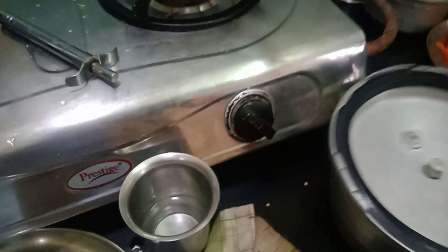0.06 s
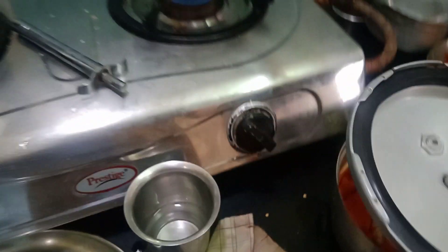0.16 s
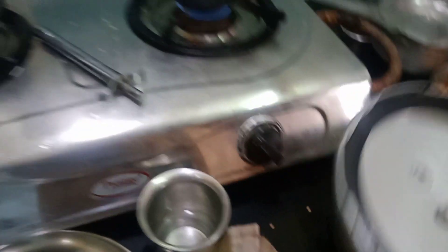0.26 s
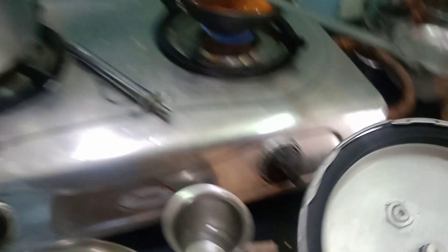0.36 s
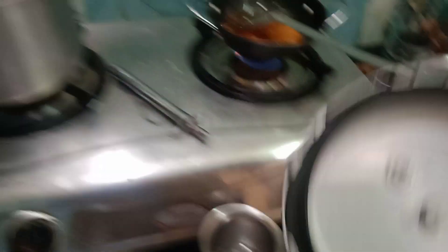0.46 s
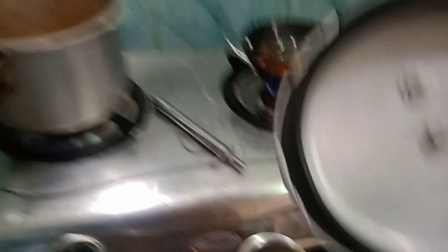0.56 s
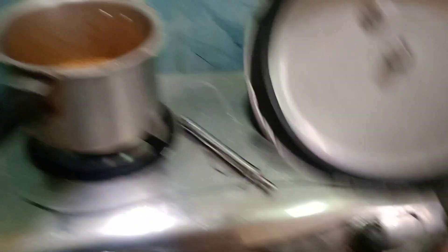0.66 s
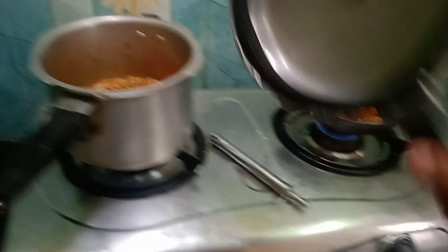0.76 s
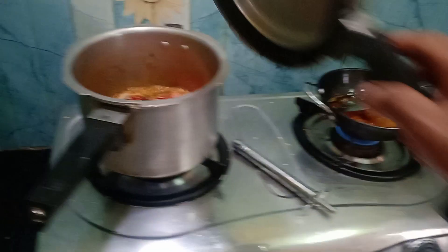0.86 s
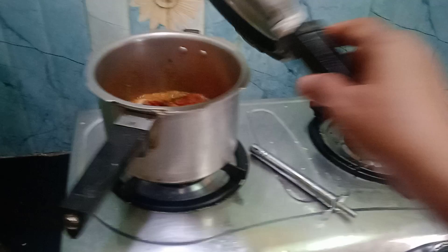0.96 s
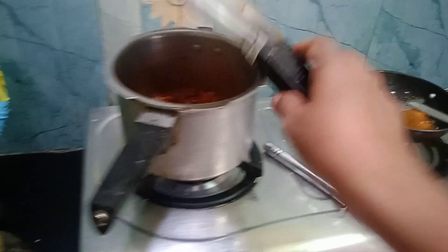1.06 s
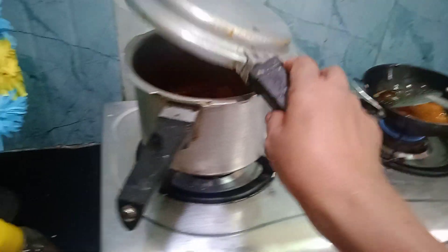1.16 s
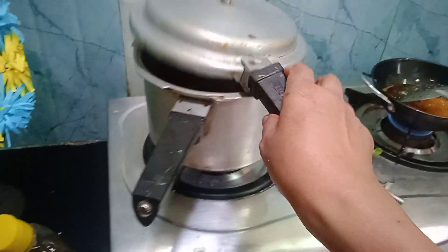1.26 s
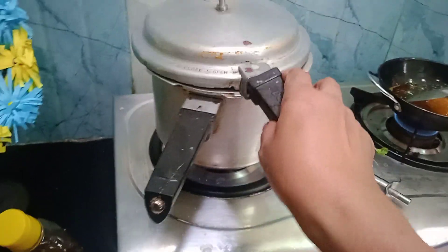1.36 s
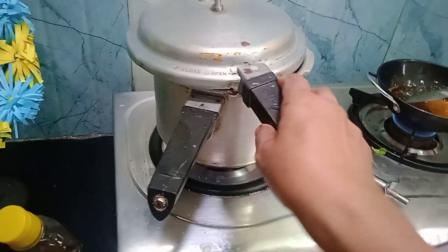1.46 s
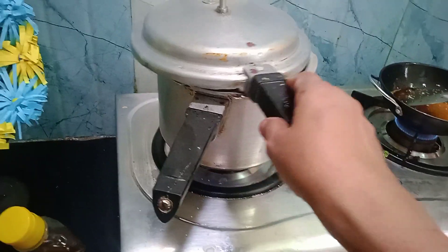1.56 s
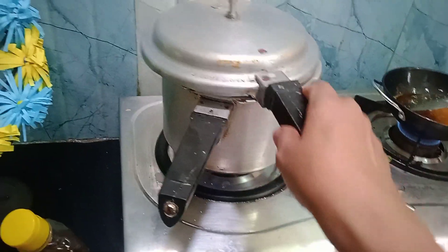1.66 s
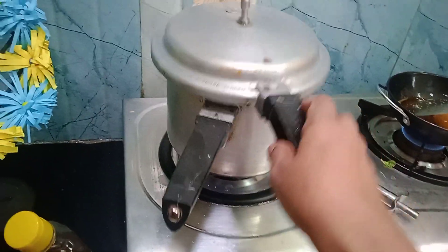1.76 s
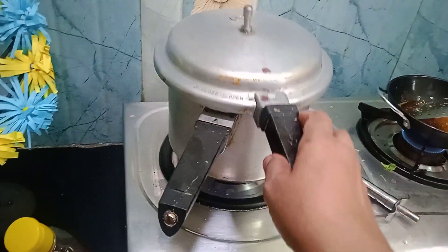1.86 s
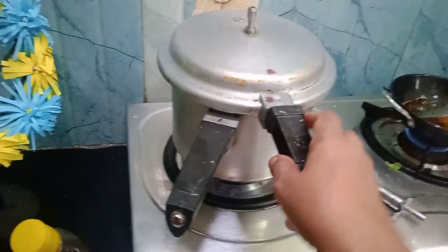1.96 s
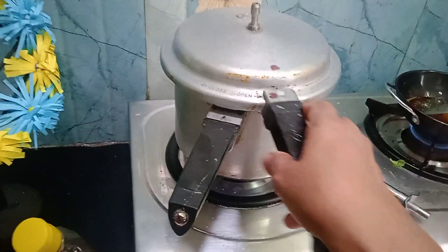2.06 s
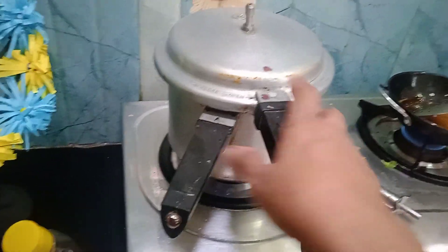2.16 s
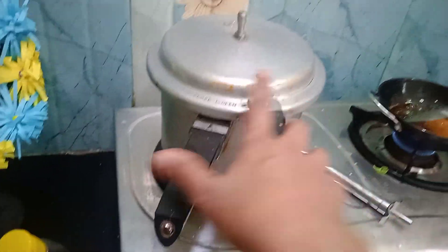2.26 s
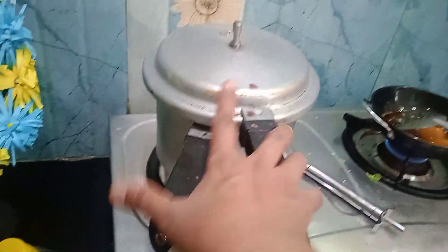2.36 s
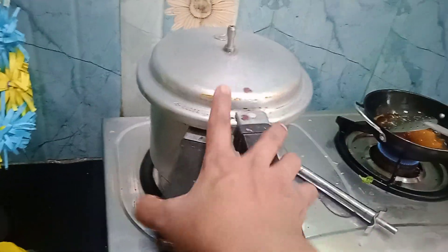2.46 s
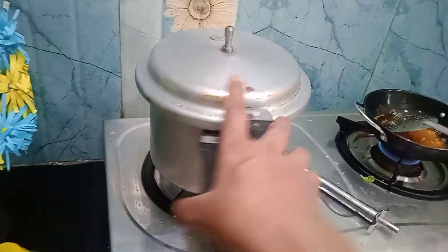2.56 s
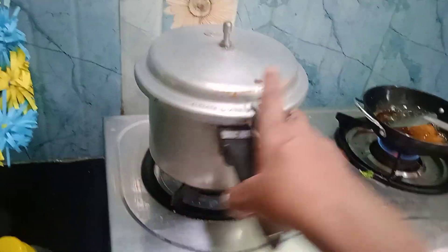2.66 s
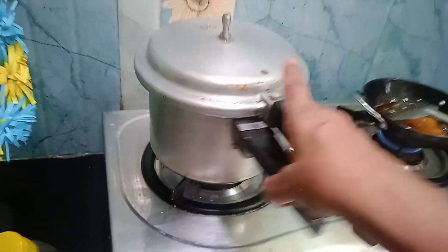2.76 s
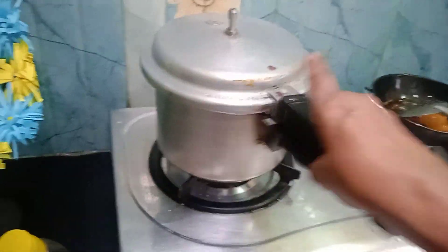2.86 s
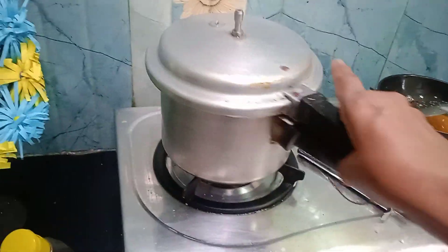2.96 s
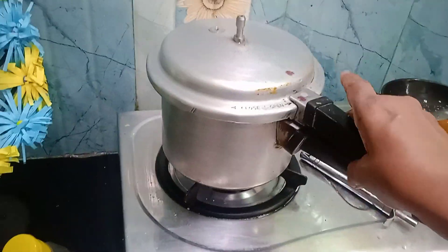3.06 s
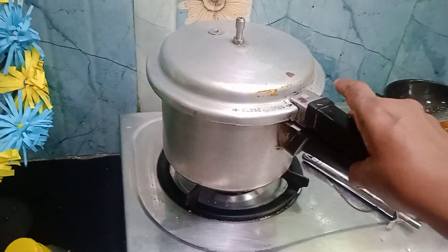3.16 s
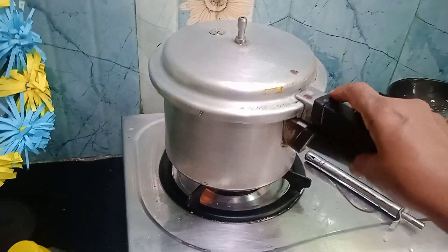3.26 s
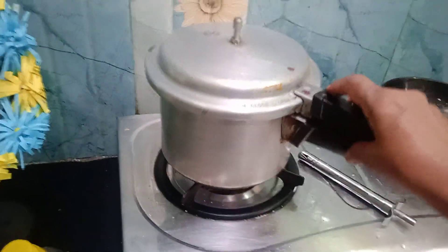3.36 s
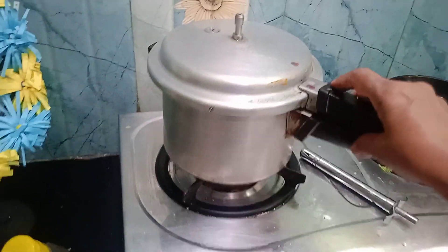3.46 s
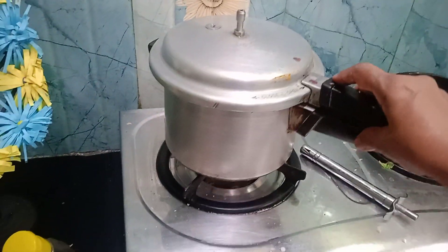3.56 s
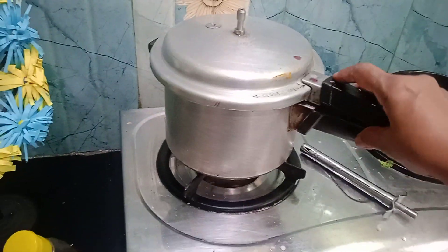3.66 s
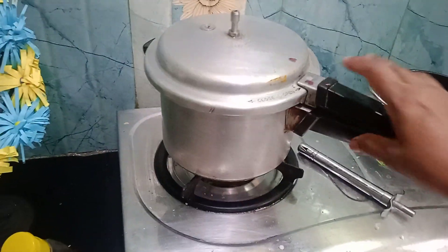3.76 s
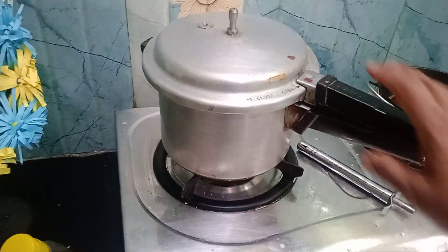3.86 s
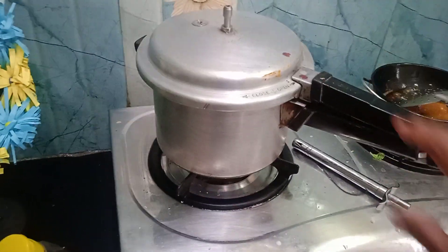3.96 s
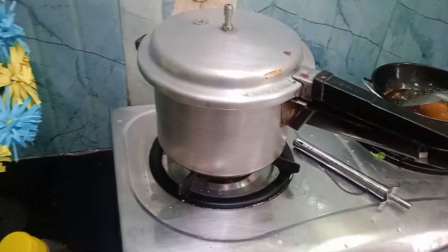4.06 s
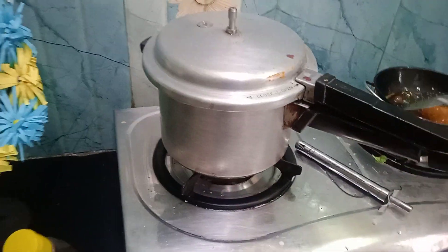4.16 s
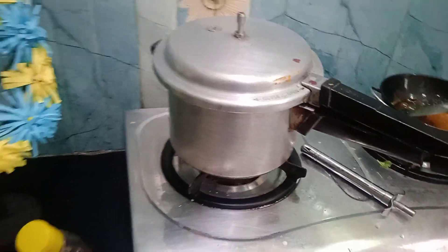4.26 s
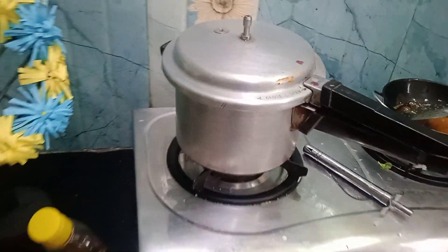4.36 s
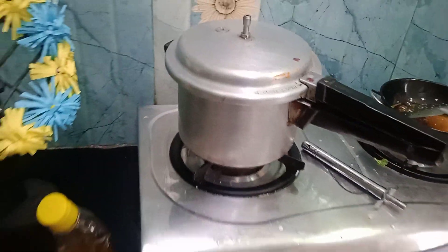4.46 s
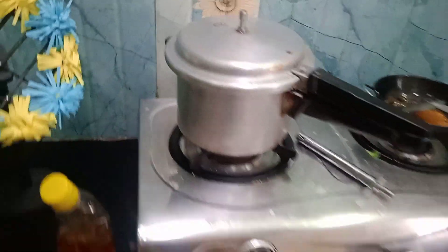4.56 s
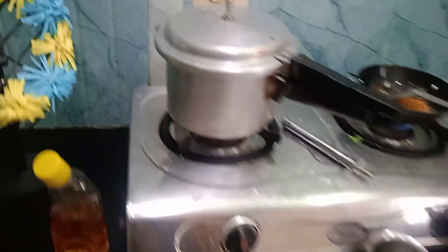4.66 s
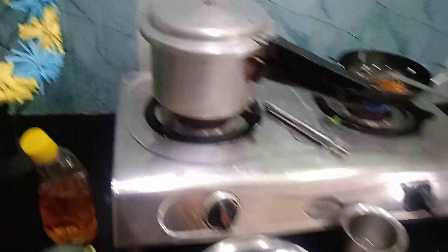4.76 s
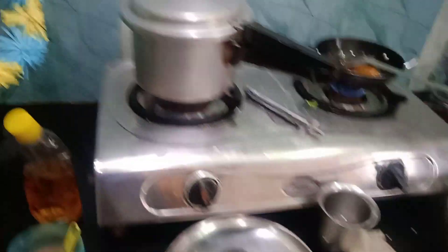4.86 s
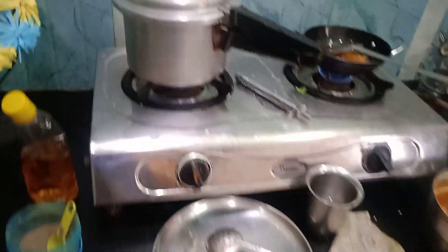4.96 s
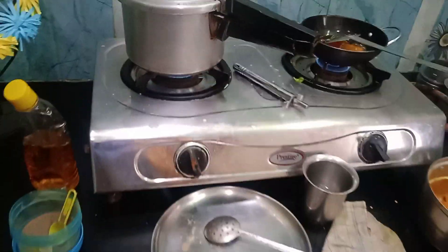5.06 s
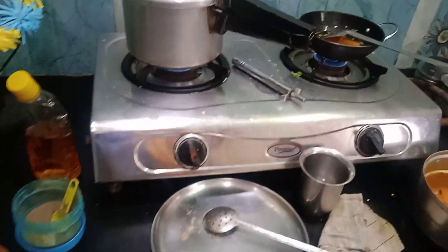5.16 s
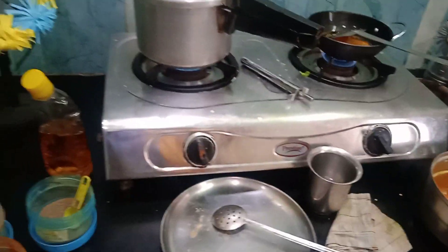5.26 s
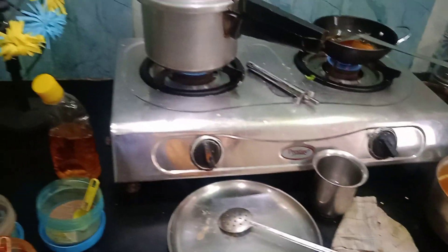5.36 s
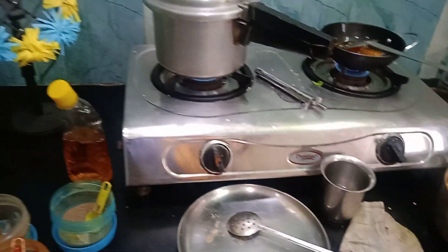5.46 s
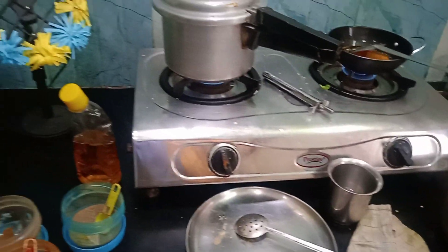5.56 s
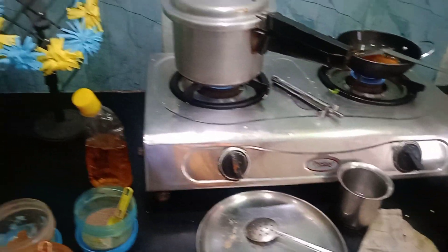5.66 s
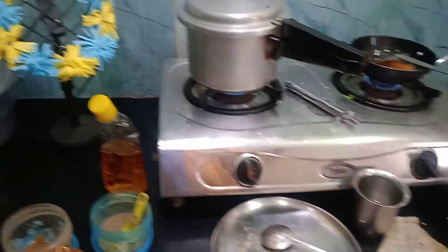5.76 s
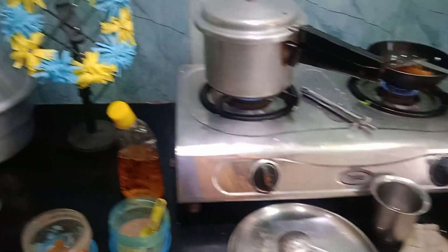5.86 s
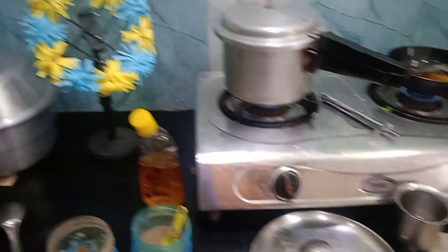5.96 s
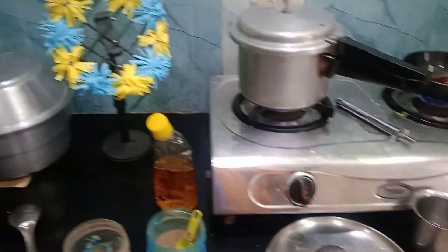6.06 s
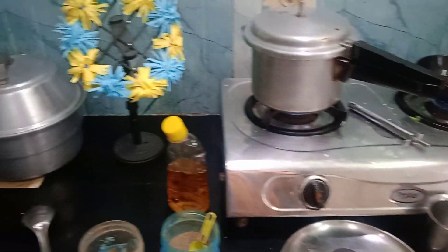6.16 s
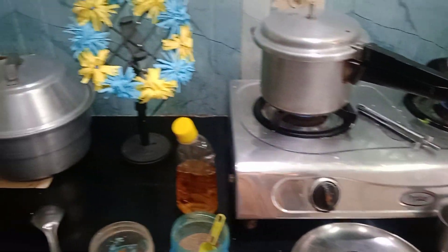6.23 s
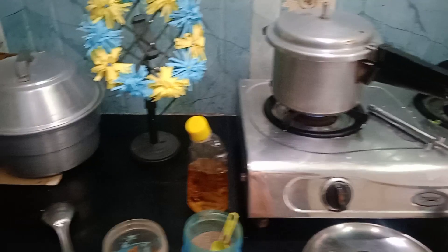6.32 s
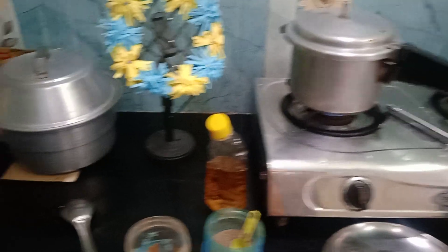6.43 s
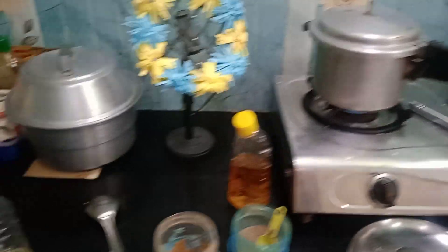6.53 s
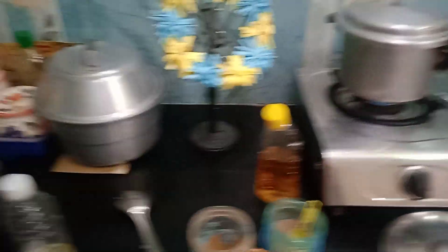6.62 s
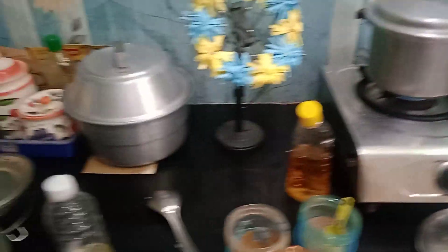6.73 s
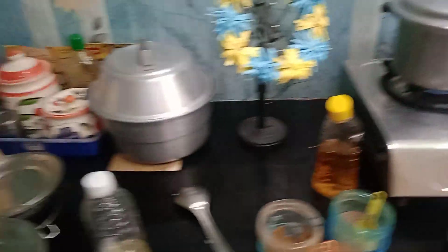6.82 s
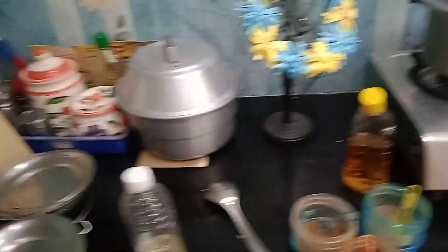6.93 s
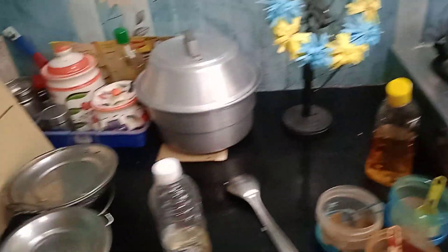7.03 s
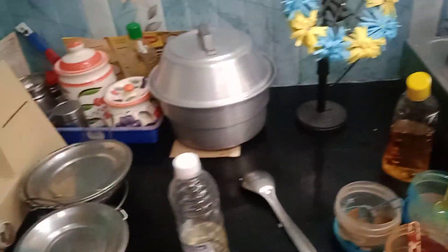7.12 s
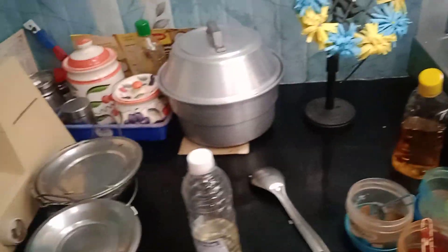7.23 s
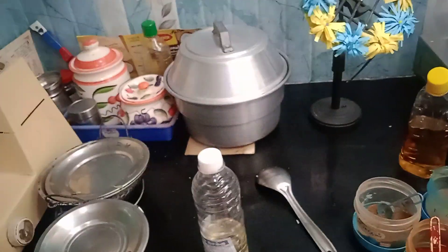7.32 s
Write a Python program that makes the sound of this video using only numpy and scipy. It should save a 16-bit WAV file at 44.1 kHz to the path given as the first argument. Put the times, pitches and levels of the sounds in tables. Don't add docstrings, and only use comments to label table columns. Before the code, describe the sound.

In a small tiled kitchen, oil sizzles softly throughout. An aluminium lid leaves a stone counter with dull taps, knocks a pot rim with a clear ring, then drops on with a bright clang. It rattles and scrapes, thuds into its seat, and locks with crisp clicks. After the handle is let go, only sizzling, faint hum and distant clinks remain, picked up by a close phone microphone.

```python
import sys
import numpy as np
from scipy import signal
from scipy.fft import rfft, irfft, next_fast_len
from scipy.io import wavfile
from scipy.ndimage import uniform_filter1d

SR = 44100
rng = np.random.default_rng(int(sys.argv[2]) if len(sys.argv) > 2 else 0)


def digitize_waveform(pressure):
    field = np.atleast_2d(pressure).T
    bounded = np.clip(field, -1, 1)
    quanta = np.round(bounded * 32767).astype(np.int16)
    wavfile.write(sys.argv[1], SR, quanta)


def boost(x):
    u = np.asarray(x, float) / 20
    return 10 ** u


N = 325899

# hz, level_db, t60_s
LID_RING = [(212, -12, .25), (270, -14, .3), (339, 0, .45), (414, -8, .4), (458, -7, .4), (563, -12, .3),
            (690, -11, .3), (764, -11, .4), (851, -13, .4), (1010, -13, .3), (1063, -14, .4),
            (1350, -14, .4), (1505, -13, .3), (1788, -11, .3), (2003, -9, .25), (2445, 3.5, .3),
            (2612, 7, .42), (2560, 0.1, .25), (2686, 2.5, .36), (3050, -10, .3), (3811, -20, .3),
            (4520, -16, .3), (4985, -4, .3), (5400, -8, .3), (6100, -8, .35), (6180, -3, .35),
            (6670, -16, .2), (7159, -6, .3)]
# hz, level_db, t60_s
CLOSED_POT_RING = [(82, -9, .25), (101, -6, .3), (195, -4, .3), (325, 0, .3), (440, -6, .3), (535, -4, .3),
                   (650, -2.5, .25), (764, 0.1, .25), (996, -9, .25), (1480, -18, .12), (1850, -14, .06),
                   (2630, -18, .12), (4900, -24, .08), (6600, -22, .06)]
# hz, density_db (per Hz)
LOOSE_METAL_HAZE = [(60, -51.5), (150, -13), (210, -9), (330, -3), (540, -8.5), (1000, -13.5), (1950, -10),
                    (2300, -15.5), (3040, -17), (6000, -9.5), (8000, -15), (12500, -40.5), (14000, -40),
                    (15200, -27.5)]
# hz, density_db (per Hz)
DAMPED_HAZE = [(50, -26.5), (85, -10), (141, -45.5), (200, -3.5), (330, 0), (540, -7.5), (760, -13.5),
               (1180, -14), (3250, -22), (6550, -11.5), (8500, -25), (12000, -39), (13800, -44.5),
               (15200, -27)]


def on_log(table, hz):
    table_hz, value = np.transpose(table)
    return np.interp(np.log(np.maximum(hz, 1)), np.log(table_hz), value)


def colour(x, table):
    n = next_fast_len(len(x))
    gain = boost(on_log(table, np.fft.rfftfreq(n, 1 / SR)))
    return irfft(rfft(x, n) * gain, n)[:len(x)]


def unit(x):
    return x / np.sqrt(np.mean(x ** 2))


def band(x, hz, width_hz):
    return signal.lfilter(*signal.iirpeak(hz, hz / width_hz, SR), x)


def walk(rate_hz):
    held = int(SR / rate_hz)
    steps = np.repeat(rng.standard_normal(N // held + 1), held)
    return uniform_filter1d(steps, held)[:N]


def fading(t, t60_table, stretch):
    spectrum = rfft(rng.standard_normal(len(t)))
    hz = np.fft.rfftfreq(len(t), 1 / SR)
    out = 0
    for low in 44 * 2. ** np.arange(10):
        octave = irfft(spectrum * ((hz >= low) & (hz < 2 * low)), len(t))
        t60_s = stretch * on_log(t60_table, low * np.sqrt(2))
        out = out + octave * boost(-60 * t / t60_s)
    return out


def hollow(t, hz, width_hz):
    lowpass = signal.butter(2, width_hz / 2, fs=SR, output="sos")
    sway = unit(signal.sosfilt(lowpass, rng.standard_normal((2, 65536))))[:, -len(t):]
    return sway[0] * np.cos(2 * np.pi * hz * t) + sway[1] * np.sin(2 * np.pi * hz * t)


def blows(events, modes, metal, ring_above_db, dense_db, dense_t60, chatter_s, crack_db, rise_s, lowest_hz):
    out = np.zeros(N + 16384)
    t = np.arange(16384) / SR
    for start_s, peak_db, bass_db, treble_db, ring in events:
        ring = max(ring, .1)
        ring_db = treble_db + ring_above_db
        balance = [(lowest_hz / 2, bass_db - 30.0), (lowest_hz, bass_db), (300, bass_db), (700, 0),
                   (1500, 0), (2400, ring_db), (3000, ring_db), (4500, treble_db)]
        chatter = rng.standard_normal(len(t)) * np.exp(-t / chatter_s)
        tones = 0
        for (hz, db, t60_s), detune in zip(modes, rng.standard_normal(len(modes))):
            turn = 2j * np.pi * hz * (1 + 0.0017 * detune) / SR
            pole = np.exp(turn - np.log(1000) / (ring * t60_s * SR))
            tone = signal.lfilter([1], [1, -pole], chatter)
            tones = tones + boost(db) * tone.imag / np.abs(tone).max()
        haze = fading(t, [(150, 1.42 * dense_t60), (8000, dense_t60)], ring)
        crack = rng.standard_normal(len(t)) * np.exp(-t / .0015)
        dense = colour(haze + boost(crack_db) * crack, metal)
        hit = tones / 2 + boost(dense_db) * dense * boost(16.5)
        contact = 1 - np.exp(-t / rise_s)
        fade_out = np.minimum(1, (t[-1] - t) * 20)
        hit = colour(hit * contact, balance) * fade_out
        k = int(start_s * SR)
        out[k:k + len(t)] += boost(peak_db) * hit
    return out[:N]


def knocks(events, width_hz, cycles, rough, tail_t60):
    out = np.zeros(N + 16384)
    t = np.arange(16384) / SR
    for start_s, peak_db, hz, tail_db in events:
        noise = rng.standard_normal((2, len(t)))
        snap_s = cycles / hz
        push = np.sin(2 * np.pi * hz * t) + rough * noise[0]
        push = push * np.exp(-(t / snap_s - 1) ** 2 * 2)
        snap = band(band(push, hz, width_hz), hz, width_hz)
        tail = unit(band(band(noise[1], hz, width_hz), hz, 0.76 * width_hz))
        tail = tail * boost(tail_db - 60 * t / tail_t60) * np.minimum(1, t / snap_s)
        k = int(start_s * SR)
        out[k:k + len(t)] += boost(peak_db) * (snap / np.abs(snap).max() + tail)
    return out[:N]


def sizzle():
    # hz, density_db (per Hz)
    oil_spectrum = [(30, -27), (150, -17.5), (255, -15.5), (593, -26.5), (772, -16.5), (1530, -20.5),
                    (3300, -9), (4650, -5), (6400, 2.5), (7800, -5.5), (10000, -21), (13700, -24.5),
                    (14500, -15), (15600, -11)]
    hz, _, cells = signal.stft(rng.standard_normal(N), SR, nperseg=2048)
    patches = uniform_filter1d(rng.standard_normal(cells.shape), size=5, axis=0)
    patches = unit(uniform_filter1d(patches, size=6, axis=1))
    depth_db = on_log([(2000, 4.5), (4500, 1.2)], hz)[:, None]
    noise = signal.istft(cells * boost(depth_db * patches), SR, nperseg=2048)[1][:N]
    return boost(-54.5 + 0.8 * walk(3.7)) * unit(colour(noise, oil_spectrum))


def stove_hum():
    # middle_s, length_s, pitch_hz, level_db
    murmurs = [(0.26, .3, 159.4, -78), (5.28, 0.75, 152.4, -80.5), (6.104, 0.51, 159, -81),
               (6.598, 1.12, 159.7, -74.5), (7.153, .35, 160, -77.5), (0.296, 0.23, 301, -76),
               (0.743, 3.3, 319, -75), (2.193, 0.36, 310, -64.5), (2.418, 0.29, 324, -67),
               (4.291, 0.65, 316, -78.5), (0.447, 0.53, 630, -69), (0.808, 0.63, 604, -70.5),
               (1.047, 0.42, 582, -63), (2.218, 0.49, 605, -71), (2.417, 0.21, 635, -68),
               (4.374, 0.32, 1050, -71.5), (5.267, 0.34, 846, -75), (5.898, 0.81, 810, -81.5),
               (6.547, 0.59, 739, -73), (6.81, 0.17, 702, -69.5), (7.105, 0.2, 699, -73.5),
               (7.264, .12, 705, -76), (0.358, 0.18, 1540, -68.5), (0.648, 1.1, 1545, -72.5),
               (0.947, 0.79, 1558, -66), (5.325, 0.11, 1580, -61), (6.529, 0.27, 1540, -68),
               (6.01, 0.54, 4340, -63.5)]
    t = np.arange(N) / SR
    flicker = boost(2.5 * walk(14))
    out = np.zeros(N)
    for middle_s, length_s, hz, db in murmurs:
        on = np.abs(t - middle_s) < .7
        swell = np.cos(np.pi * np.clip((t[on] - middle_s) / length_s, -.5, .5)) ** 2
        width_hz = min(35 + 0.13 * hz, 500)
        out[on] += boost(db) * swell * flicker[on] * hollow(t[on], hz, width_hz)
    return out


def far_clinks():
    # start_s, peak_db, bass_db, treble_db, ring (share of free ring length)
    clinks = [(0.82, -52.5, -11, -0.5, 1), (3.8022, -56.5, -7, -9, 0.87), (4.5983, -57, -22.5, 5, 0.42),
              (5.305, -52, -42, 3, 0.62), (6.123, -66.5, -16.5, 7, 0.84), (6.4882, -55.5, -22, 1, 0.49),
              (7.3002, -65.5, -13, -26, 0.71)]
    # hz, level_db, t60_s
    clink_ring = [(1210, 3, 0.0426), (1450, 0, 0.049), (1560, -5.5, 0.051), (1700, -7, .04),
                  (2480, -6, 0.022), (2850, -4.5, 0.036), (4087, 5.5, 0.043)]
    return blows(clinks, clink_ring, LOOSE_METAL_HAZE, ring_above_db=6, dense_db=-7.5, dense_t60=0.7,
                 chatter_s=0.014, crack_db=-1.9, rise_s=0.0024, lowest_hz=200)


def lift_off_counter():
    # start_s, peak_db, bass_db, treble_db, ring (share of free ring length)
    lift_blows = [
        (0.003, -39, 3.5, -17, 0.62),
        (0.022, -25, -11.5, -3.5, 1),
        (0.15, -34.5, 4.5, 3, 0.7),
        (0.248, -46.5, 2, -18, 0.47),
        (0.29, -49, -4, 3, 0.62),
    ]
    # hz, level_db, t60_s
    stone_ring = [(112.6, -14.5, 0.55), (244, -2.5, 0.23), (277.3, 4.5, 0.48), (378, -1.5, 0.077),
                  (439, -6.5, 0.19), (813, -12, 0.059), (1250, 0.5, 0.015), (2360, -8, 0.024),
                  (3580, -18, 0.051)]
    return blows(lift_blows, stone_ring, DAMPED_HAZE, ring_above_db=1.5, dense_db=-12, dense_t60=0.35,
                 chatter_s=0.0063, crack_db=19.5, rise_s=0.0018, lowest_hz=92.0)


def touch_rim():
    # start_s, peak_db, bass_db, treble_db, ring (share of free ring length)
    rim_blows = [
        (1.135, -18.5, -11.5, -12, 0.69),
        (1.22, -35, -15, -10, 0.66),
    ]
    # hz, level_db, t60_s
    rim_ring = [(525, -10, .3), (566, 9, .6), (610, -2.5, .35), (690, -9, .25), (1001, -7, .22),
                (1120, -11, .25), (1319, -9, .25), (1513, -8, .25), (1863, -15, .25), (2643, -12, .4),
                (3607, -18, .15), (4942, -20, .2), (5340, -18, .2), (6632, -22, .15), (7364, -20, .15)]
    return blows(rim_blows, rim_ring, LOOSE_METAL_HAZE, ring_above_db=4.0, dense_db=-4, dense_t60=0.43,
                 chatter_s=0.008, crack_db=13.5, rise_s=.0003, lowest_hz=149.9)


def slam_lid():
    # start_s, peak_db, bass_db, treble_db, ring (share of free ring length)
    slam_blow = [
        (1.365, -17.5, -0.5, -3, 0.87),
    ]
    return blows(slam_blow, LID_RING, LOOSE_METAL_HAZE, ring_above_db=-1.0, dense_db=-4, dense_t60=0.41,
                 chatter_s=0.009, crack_db=12, rise_s=0.00071, lowest_hz=180)


def rattle_lid():
    # start_s, peak_db, bass_db, treble_db, ring (share of free ring length)
    rattle_blows = [(1.253, -24, -7, -2.5, 0.29), (1.488, -33, 8, -1, 0.16), (1.552, -28.5, -1.5, -7, 0.24),
                    (1.609, -37, -3, -13, 0.27), (1.666, -37, 1, -9.5, 0.34), (1.702, -29, 4.5, -4, 0.26),
                    (1.765, -31, 8, -5, 0.49), (1.776, -25, -22, -11, 0.27),
                    (1.818, -33.5, -26, -3.5, 0.22), (1.847, -37, 2.5, -8.5, 0.51),
                    (1.925, -40, -6, -7.5, 0.22)]
    return blows(rattle_blows, LID_RING, LOOSE_METAL_HAZE, ring_above_db=-1.3, dense_db=-2, dense_t60=0.68,
                 chatter_s=.005, crack_db=12, rise_s=0.00091, lowest_hz=216)


def wobble():
    # start_s, peak_db, pitch_hz, tail_db
    thumps = [(0.089, -35.5, 357, -15), (0.116, -30, 433, -29), (1.799, -31.5, 304, -10),
              (1.92, -33.5, 178.4, -21), (1.974, -46, 470, -22), (2.898, -27, 189, -32),
              (2.896, -33.5, 90, -11.5)]
    return knocks(thumps, width_hz=130, cycles=2.3, rough=3, tail_t60=0.091)


def seat_lid():
    # start_s, peak_db, bass_db, treble_db, ring (share of free ring length)
    seat_blows = [(2.124, -42.5, -5, 1, 0.53), (2.54, -22.5, -7, -9, 0.88), (2.839, -43, -2, -18, 0.43),
                  (2.893, -29, -9, -3.5, 0.98), (2.905, -28.5, 1, -4, 0.3), (2.917, -21, -12, -8.5, 0.36),
                  (2.958, -35, -28, 0.5, 1), (3.034, -28, -27, 2, 0.29), (3.364, -39, -20, 2, 0.26),
                  (3.487, -51, 7, -15, 0.75), (3.824, -35.5, -5.5, -9, 0.71),
                  (3.846, -30, -13.5, -1.5, 0.34)]
    return blows(seat_blows, CLOSED_POT_RING, DAMPED_HAZE, ring_above_db=5.5, dense_db=-1.0, dense_t60=0.34,
                 chatter_s=0.011, crack_db=5.5, rise_s=0.0016, lowest_hz=140)


def latch():
    # start_s, peak_db, pitch_hz, tail_db
    snaps = [(2.894, -26.5, 1800, -14), (2.6491, -17.5, 4800, -17.5), (3.3657, -32.5, 5160, -12),
             (3.3887, -29, 5840, -11.5)]
    return knocks(snaps, width_hz=1600, cycles=2.9, rough=0.69, tail_t60=0.19)


def twist_shut():
    # start_s, held_s, belly_db, wall_db (above belly), hiss_db (above belly)
    pushes = [(1.78, 0.063, -40.5, 0, -12), (1.83, .09, -42, -3.5, -17), (1.93, 0.12, -60, 1, 8),
              (2.62, 0.3, -50.5, 1.5, -10), (2.905, 0.02, -38.5, 8, -18), (2.95, 0.075, -37.5, 7, -8),
              (3.029, 0.017, -36.5, 10, 12.5), (3.1, 0.043, -53, 4, 8), (3.2, 0.21, -60, 8.5, 0),
              (3.37, 0.044, -53.5, 3, -2), (3.48, 0.18, -59.5, 6, -29), (3.87, 0.022, -41, -9, -1),
              (3.949, 0.17, -57.5, -3.5, -8)]
    push_s, let_go_db_per_s = 0.028, 212.5
    t = np.arange(N) / SR
    grains = (rng.random(N) < 4000 / SR) * rng.standard_normal(N)
    body = 0
    for hz, db, t60_s in CLOSED_POT_RING:
        if hz < 1300:
            body = body + boost(db) * unit(band(grains, hz, 16.0 / t60_s))
    rubbing = unit(grains) + 1.5 * rng.standard_normal(N)
    haze = colour(rubbing, DAMPED_HAZE) * boost(2 * walk(60))
    both = unit(body) + 0.88 * unit(haze)
    belly = unit(colour(both, [(50, -21.5), (130, -19), (200, -9.5), (400, -9), (500, -19)]))
    wall = unit(colour(both, [(400, -18), (500, -4), (1100, -8), (4000, -9.5)]))
    hiss = unit(colour(haze, [(1500, -4), (4000, -3.5)]))
    out = 0
    for start_s, held_s, belly_db, wall_db, hiss_db in pushes:
        release_db = let_go_db_per_s * np.maximum(t - start_s - held_s, 0)
        push = np.clip((t - start_s) / push_s, 0, 1) * boost(belly_db - 8 - release_db)
        out = out + push * (belly + boost(wall_db) * wall + boost(hiss_db) * hiss)
    return out


def tiled_room(near):
    # hz, t60_s
    room_decay = [(100, 0.54), (1000, 0.48), (6000, 0.35), (16000, 0.25)]
    t = np.arange(32768) / SR
    echo = fading(t, room_decay, 1.0) * (t > .004)
    echo = echo / np.sqrt(np.sum(echo ** 2))
    return boost(-9.5) * signal.fftconvolve(near, echo)[:N]


def scene():
    stove = sizzle() + stove_hum()
    near = far_clinks() + lift_off_counter() + touch_rim() + slam_lid() + rattle_lid()
    near = near + wobble() + seat_lid() + latch() + twist_shut()
    near = signal.sosfilt(signal.butter(4, 68, "high", fs=SR, output="sos"), near)
    return (near + tiled_room(near) + stove)[None]


def band_limit(x):
    return signal.sosfilt(signal.butter(12, 17110, fs=SR, output="sos"), x)


def record(dry):
    heard = signal.sosfilt(signal.ellip(10, .3, 60, 15900, fs=SR, output="sos"), dry)
    return band_limit(heard)


dry = scene()
out = record(dry)
digitize_waveform(out)
```